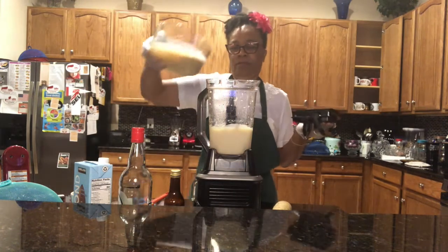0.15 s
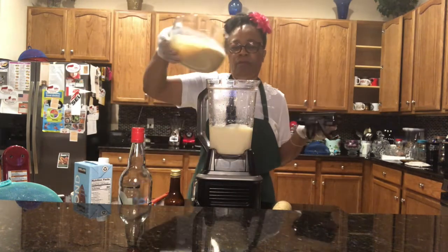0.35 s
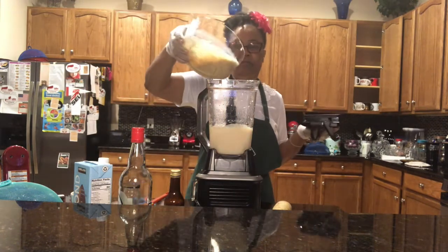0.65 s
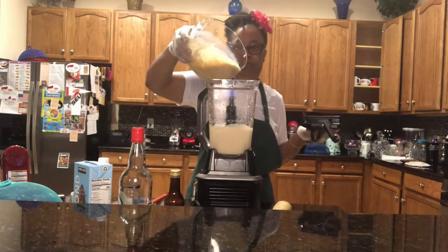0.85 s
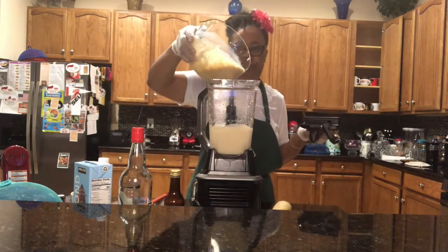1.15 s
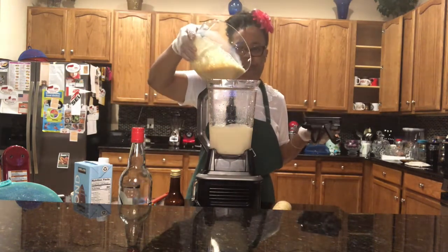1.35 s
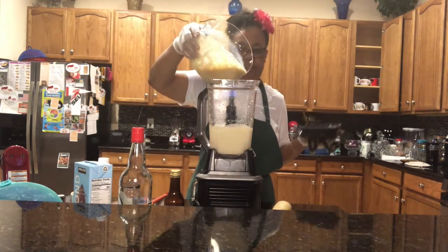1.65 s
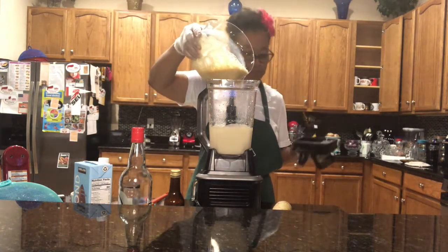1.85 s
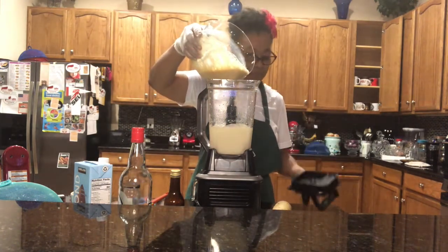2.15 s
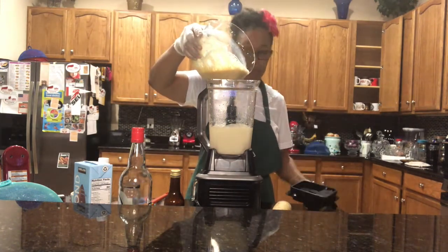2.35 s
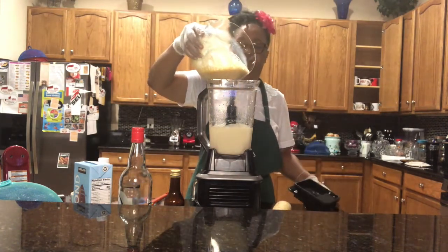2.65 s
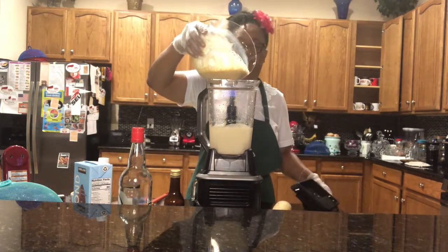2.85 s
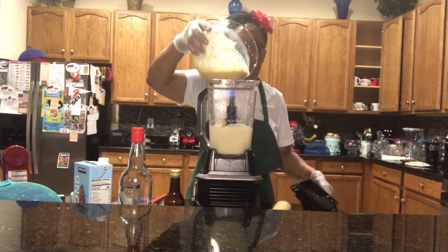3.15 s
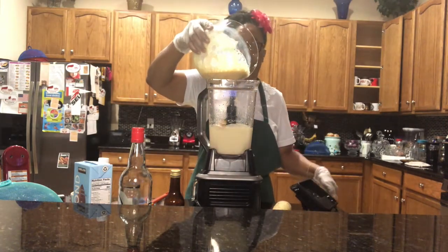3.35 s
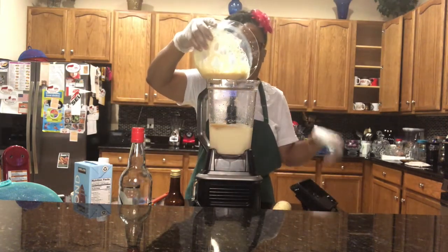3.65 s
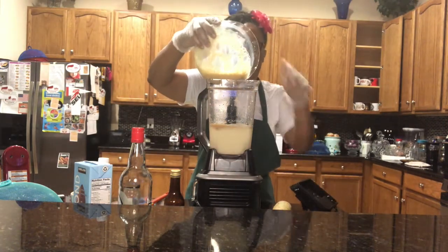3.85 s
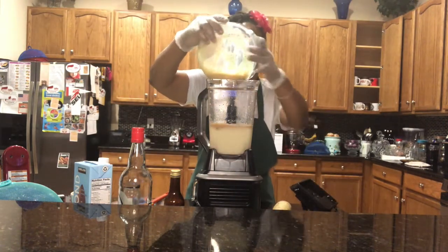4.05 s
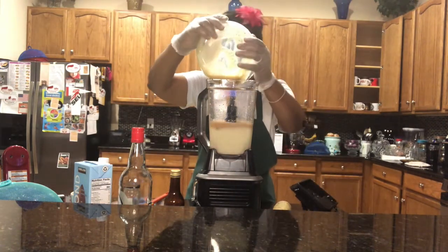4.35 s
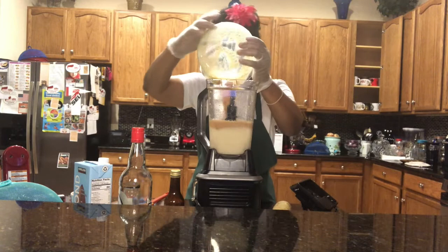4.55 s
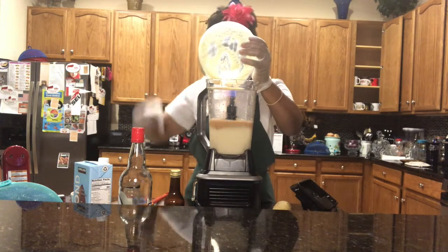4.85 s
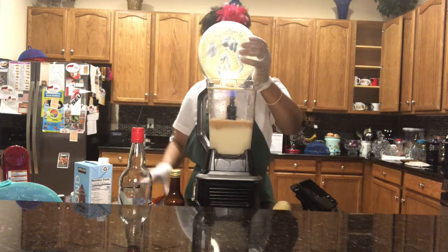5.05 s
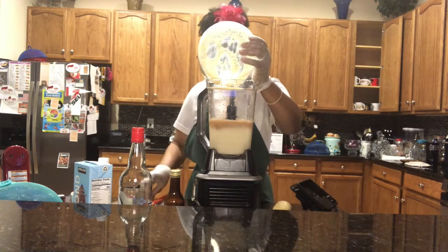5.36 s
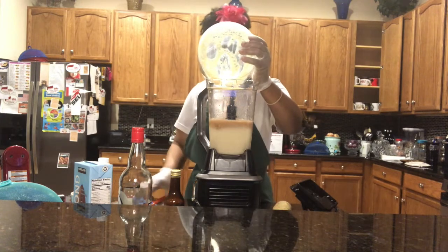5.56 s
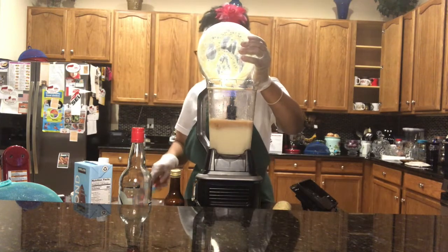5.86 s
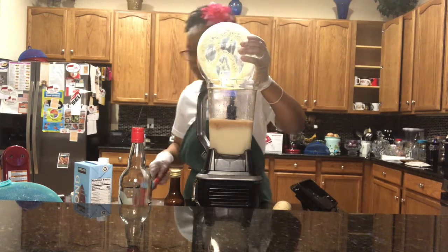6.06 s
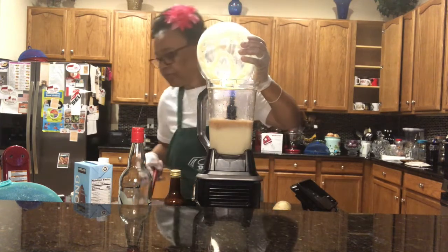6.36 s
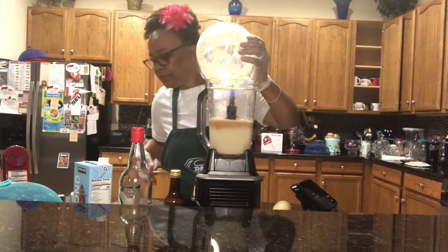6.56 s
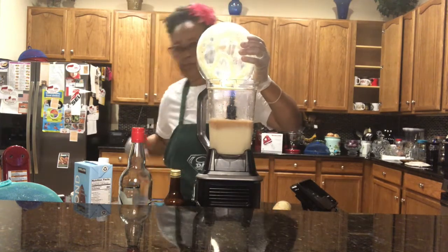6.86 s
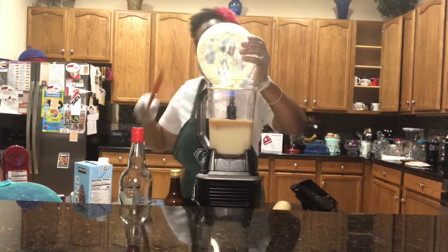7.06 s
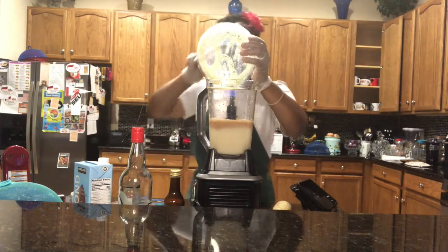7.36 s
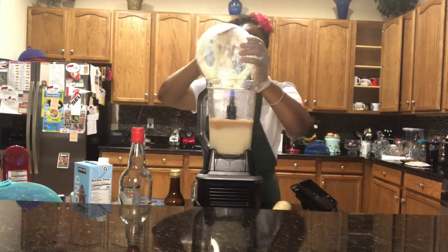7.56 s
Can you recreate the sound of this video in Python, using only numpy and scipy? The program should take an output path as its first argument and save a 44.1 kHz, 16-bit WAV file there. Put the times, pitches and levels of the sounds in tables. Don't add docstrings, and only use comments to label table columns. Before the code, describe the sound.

A quiet kitchen with hard walls, heard from across the counter: soft low room air and a steady faint fridge hum throughout. A very faint, high, distant squeak slips downward at 0.4 s and briefly again at 0.74. At 0.82 a glass bowl knocks firmly on a blender jar, short, low and damped; a light touch follows at 1.74. At 2.15 a plastic lid hits the counter with a loud dull clack, bounces, then drops flat around 2.66 with small rocking clacks. Soft bowl bumps come at 3.3-3.6, faint cloth rustle near 3.8, dry ticks and another bowl touch at 4.6. Tiny glass nudges follow at 5.0-5.2, a handle knock on a jar at 5.4, weaker at 5.6. Rustling leads through light grazes at 6.5 to a very loud, bright glass bottle clink at 6.65, its short ring trailing into the room. Muted spatula and bowl taps close at 7.5-7.6.

```python
import sys
import numpy as np
from scipy import signal
from scipy.io import wavfile
from scipy.ndimage import uniform_filter1d

SR = 44100
rng = np.random.default_rng(int(sys.argv[2]) if len(sys.argv) > 2 else 0)


def digitize_waveform(pressure):
    field = np.atleast_2d(pressure).T
    bounded = np.clip(field, -1, 1)
    quanta = np.round(bounded * 32767).astype(np.int16)
    wavfile.write(sys.argv[1], SR, quanta)


def elevation(decibels):
    levels = np.asarray(decibels, float)
    return 10 ** (levels / 20)


N = 340011

# frequency in Hz, level in dB per Hz.
AIR_COLOUR = [(22, -55.5), (40, -29.5), (58, -11), (110, -10.5), (180, -4.5), (260, -9), (450, -11),
              (700, -15), (1000, -20), (2000, -28), (4000, -31.5), (7600, -35), (8600, -40.5), (14000, -44),
              (16000, -57.5)]
# time in seconds, level in dB.
AIR_SWELL = [(0, -2), (3.2, 0), (7.71, -1)]
# frequency in Hz, width of the fuzz in Hz, level in dB, steady share from 0 to 1.
FRIDGE_TONES = [(60, 6, -85, .4), (150, 8, -80, .3), (231, 14, -69, .85), (309, 10, -77, .6),
                (419, 10, -77, .6), (2250, 60, -94, .1), (3140, 45, -90, .4)]
# start in seconds, length in seconds, first pitch in Hz, top level in dB.
SQUEAK_SLIPS = [
    (.4, 0.33, 4465, -78.5),
    (0.739, 0.093, 4260, -80),
]
# start in seconds, length in seconds, top level in dB,
# brightness as high band minus low band in dB.
CLOTH_STROKES = [
    (1.003, 0.22, -95, 10),
    (3.8, 0.53, -74, -12),
    (4.498, .2, -84, -3),
    (4.984, 0.23, -81, 5.5),
    (5.699, 0.45, -80.5, 0),
    (6.119, .28, -75.5, 3),
    (6.419, 0.22, -73, -6),
]

# start in seconds, peak in dB, hardness in dB per octave above 1 kHz, # crack against the ring in dB.
BOWL_BLOWS = [(.8175, -26.5, 1, -15), (.833, -47, -2, -3), (.845, -34, -1, -17), (.863, -46, 1, -14),
              (1.741, -50, -5, -4), (3.333, -47.5, -8, -10), (3.436, -43, -3.5, -10), (3.513, -58, 0, -15),
              (3.623, -53.5, -3, -14), (4.6, -54, -4, -22), (4.607, -48, -5, -29), (7.555, -39, -2, -14)]
LID_BLOWS = [
    (2.1452, -19.5, -0.5, -4.5),
    (2.184, -31.5, 0, -1),
    (2.278, -35.5, -7, 8),
]
LID_SETTLES = [
    (2.596, -47, -2, -14),
    (2.6595, -34, 1.5, 4),
    (2.666, -28.5, 2.5, -2),
    (2.724, -34, 1.5, 2),
    (2.74, -40.5, -3, -17),
    (3.029, -60, 2, -11),
]
JAR_NUDGES = [
    (5.018, -51.5, -2.5, -4),
    (5.04, -57, -4, -8),
    (5.14, -59, 3, -8),
    (5.222, -57.5, 1, -3),
]
HANDLE_BLOWS = [
    (5.4062, -38, -2.4, 7.5),
    (5.423, -42.5, 2, 7),
    (5.608, -53, -3, 5),
    (5.62, -55, -5.5, 6),
    (5.634, -57, -3, -12),
]
BOTTLE_GRAZES = [
    (6.524, -65, 0, -12),
    (6.545, -57.5, -1, -2.5),
    (6.562, -58, -3.5, -5.5),
    (6.571, -45, 0, -13.5),
]
BOTTLE_BLOWS = [
    (6.634, -49.5, -4, -10.5),
    (6.646, -9, -1.1, -4),
]
SPATULA_BLOWS = [
    (7.469, -50.5, -8, -13),
    (7.474, -48, 0.5, -5),
    (7.482, -44, -5.5, -17),
    (7.602, -58, -2, -10.5),
]

# frequency in Hz, level in dB, time to fall 60 dB in seconds.
BOWL_MODES = [(490, -1, .024), (560, 0, .03), (630, -3, .024), (3080, -19, .01)]
LID_MODES = [(560, -5, .016), (660, 0, .018), (800, -2, .016), (1150, -4, .01)]
JAR_LOW_MODES = [(716, 0, .14), (1940, -5, .07), (3122, -2, .07), (4339, -6, .08)]
HANDLE_MODES = [(716, -9, .16), (1330, -7, .02), (1534, -4, .03), (1930, -8, .06), (2584, -4, .02),
                (3122, -7, .07), (4339, -13, .08), (5750, -19, .04), (11140, -5, .01), (13550, -11, .01)]
BOTTLE_LOW_MODES = [(1918, 0, .25), (3055, -9, .06)]
SPATULA_MODES = [(480, -2, .025), (600, 0, .02), (1500, -8, .01), (2600, -9, .025), (4000, -15, .018),
                 (8700, -30, .008)]
BOTTLE_HZ = [726, 1373, 1912, 1922, 2410, 3012, 3055, 3215, 3620, 4255, 4338, 5058, 5214, 5250, 5771, 7180,
             7381, 9873, 12010, 14350]
# level in dB, time to fall 60 dB in seconds.
BOTTLE_RINGS = [(-30.5, 0.15), (-31, 0.2), (-19, 0.45), (-12, .2), (-24, 0.13), (-14, .15), (-3, .16),
                (-9, 0.061), (-6, 0.012), (-18.5, .15), (-10, 0.21), (-14, 0.16), (-15.5, 0.1),
                (-18.5, .15), (-20, 0.31), (-15, 0.1), (-21, 0.15), (-28, .12), (-25.5, .04), (-10, .025)]

# frequency in Hz, level in dB per Hz.
BOWL_CRACK = [(300, -3), (600, 0), (1500, -3.5), (3000, -7), (6000, -18.5), (15000, -32)]
LID_CRACK = [(250, -51), (420, -8.5), (650, -2.5), (1200, -5.5), (1700, -7.5), (2500, -13), (4700, -12.5),
             (8000, -25), (12000, -29.5), (16000, -37)]
HANDLE_CRACK = [(290, -30.5), (500, -16.5), (714, -13.5), (909, -17.5), (1300, 2), (2330, -7), (3090, -0.5),
                (4740, -19), (8490, -37), (11100, -25), (15000, -37.5)]
BOTTLE_CRACK = [(200, -28), (500, -23), (1000, -18), (2000, -15.5), (2600, -12.5), (3500, -3.5), (5000, -7),
                (6500, -21.5), (8000, -19), (10500, -25), (12500, -25), (14300, -15.5), (16000, -28)]

# start in seconds, peak in dB, centre in Hz.
TICKS = [(1.729, -51, 1800), (1.748, -66, 4000), (2.034, -53, 5670), (3.1, -67, 1200), (3.249, -64.5, 2090),
         (3.33, -52, 2070), (3.701, -62, 2600), (3.873, -62, 3500), (4.048, -60, 2000), (4.23, -63, 2700),
         (4.4463, -53, 2300), (4.708, -73, 2980), (5.109, -64, 6460), (5.164, -56, 4000),
         (5.818, -58.5, 3900), (6.437, -59.5, 1593), (6.494, -59, 4350), (6.586, -49, 7400)]
# start in seconds, peak in dB, centre in Hz.
PINGS = [
    (2.034, -57.5, 3820),
    (2.062, -61, 1310),
    (2.147, -47, 4900),
    (4.449, -58.5, 1480),
    (4.54, -67, 6900),
    (5.823, -68, 8060),
    (5.949, -59.5, 3700),
    (6.588, -68, 12600),
]
# frequency in Hz, time to fall 60 dB in seconds.
ROOM_DECAY = [(200, 0.57), (500, 0.61), (1500, 0.77), (4000, 0.72), (8000, 0.68), (14000, 0.28)]


def evened(x):
    return x / np.sqrt(np.mean(x ** 2) + 1e-30)


def read(points, hz):
    f, value = np.transpose(points)
    return np.interp(np.log(hz + 1), np.log(f + 1), value)


def add(mix, s, sound):
    part = mix[round(s * SR):][:len(sound)]
    part += sound[:len(part)]


def resonate(x, hz, width):
    turn = np.exp(2j * np.pi * np.cumsum(hz * np.ones(len(x))) / SR)
    r = np.exp(-np.pi * width / SR)
    smooth = signal.lfilter([1 - r], [1, -r], x / turn)
    return 2 * (turn * smooth).real


def band(x, lo_hz, hi_hz):
    return signal.sosfilt(signal.butter(2, [lo_hz, hi_hz], "bandpass", fs=SR, output="sos"), x)


def bassless(x, cut_hz):
    return signal.sosfilt(signal.butter(3, cut_hz, "highpass", fs=SR, output="sos"), x)


def fridge_hum():
    out = np.zeros(N)
    for hz, width, db, steady in FRIDGE_TONES:
        fuzz = resonate(rng.standard_normal(N), hz, width)
        fuzz = evened(resonate(fuzz, hz, width))
        tone = np.sqrt(2) * np.sin(2 * np.pi * (hz * np.arange(N) / SR + rng.random()))
        out += elevation(db) * (steady * tone + np.sqrt(1 - min(steady, 1) ** 2) * fuzz)
    return out


def air():
    frames, hz = N // 512 + 5, np.fft.rfftfreq(2048, 1 / SR)
    a, b, patches = rng.standard_normal((frames, 1025, 3)).T
    patches = uniform_filter1d(patches, 20, 0)
    patches = evened(uniform_filter1d(patches, 6, 1))
    spectrum = (a + 1j * b) * elevation(read(AIR_COLOUR, hz)[:, None] + patches)
    noise = signal.istft(spectrum, nperseg=2048, noverlap=1536)[1]
    tone = elevation(-67.5) * evened(noise[:N]) + fridge_hum()
    return tone * elevation(np.interp(np.arange(N) / SR, *np.transpose(AIR_SWELL)))


def squeak():
    rise_s, sag_hz_per_s, fade_db_per_s = 0.025, 720, 32
    out = np.zeros(N)
    for s, length, hz, top_db in SQUEAK_SLIPS:
        t = np.arange(0, length, 1 / SR)
        whistle = evened(resonate(rng.standard_normal(len(t)), hz - sag_hz_per_s * t, 25))
        edges = np.minimum(np.minimum(t, length - t) / rise_s, 1)
        add(out, s, elevation(top_db - fade_db_per_s * t) * edges * whistle)
    return out


def click(colour, tilt_db):
    hz = abs(np.fft.fftfreq(2048, 1 / SR))
    gain_db = read(colour, hz) + tilt_db * np.log2(np.maximum(hz, 1000) / 1000)
    log_gain = np.log(elevation(gain_db))
    pulse = np.fft.ifft(np.exp(np.conj(signal.hilbert(log_gain)))).real[:1024]
    return pulse / np.linalg.norm(pulse)


def flutter_of(count, t, depth):
    rock_s = 0.017
    rock = uniform_filter1d(rng.standard_normal((2, count, len(t))), round(rock_s * SR))
    wander = evened(rock[0]) + 1j * evened(rock[1])
    return 1 + depth * np.minimum(t / rock_s, 1) * wander


def struck(blows, modes, colour, rise_s, crack_s, lag_s, room_db, cut_hz=390, flutter=0.26):
    hz, db, t60 = np.transpose(modes)[:, :, None]
    t = np.arange(2048 + round(t60.max() * SR)) / SR
    near, far = np.zeros(N), np.zeros(N)
    for s, peak_db, tilt_db, crack_db in blows:
        spot_db = 1.53 * rng.standard_normal(hz.shape) + tilt_db * np.log2(np.maximum(hz, 1000) / 1000)
        swell = (1 - np.exp(-t * hz / 1000 / rise_s)) ** 2
        tones = (flutter_of(len(hz), t, flutter) * np.exp(2j * np.pi * hz * t)).imag
        ring = (elevation(db + spot_db - 60 * t / t60) * swell * tones).sum(0)
        ring = np.roll(ring, round(lag_s * SR))
        chatter = rng.standard_normal(2048) * np.exp(-t[:2048] / crack_s)
        pulse = np.pad(click(colour, tilt_db), (0, len(t) - 1024))
        crack = signal.fftconvolve(chatter, pulse)[:len(t)]
        size = elevation(crack_db) * np.linalg.norm(ring)
        heard = ring + size * crack / np.linalg.norm(crack)
        gain = elevation(peak_db) / abs(heard).max()
        add(near, s, gain * heard)
        add(far, s, gain * elevation(room_db) * (ring + size * pulse))
    return bassless(np.array([near, far]), cut_hz)


def bowl():
    return struck(BOWL_BLOWS, BOWL_MODES, BOWL_CRACK,
                  rise_s=0.0019, crack_s=0.0054, lag_s=0.001957, room_db=-9.2)


def rustle():
    out = np.zeros(N)
    for s, length, top_db, bright_db in CLOTH_STROKES:
        u = np.linspace(0, 1, round(length * SR))
        clumps = elevation(1.6 * evened(uniform_filter1d(rng.standard_normal(len(u)), 300)))
        slips = clumps * rng.standard_normal(len(u))
        cloth = evened(band(slips, 770, 2900)) + elevation(bright_db) * evened(band(slips, 2100, 6400))
        stroke_db = top_db + np.interp(u, [0, 0.61, 1], [-10.5, 0, -10.5])
        add(out, s, elevation(stroke_db) * cloth * signal.windows.tukey(len(u), .15))
    return out


def puffs(rows, share, room_db):
    out, t = np.zeros((2, N)), np.arange(900) / SR
    for s, peak_db, hz in rows:
        width = share * hz
        puff = rng.standard_normal(len(t)) * np.exp(-t / 0.0016)
        impulse = 1. * (t == 0)
        tick = resonate(resonate(puff, hz, width), hz, width)
        plain = resonate(resonate(impulse, hz, width), hz, width)
        gain = elevation(peak_db) / abs(tick).max()
        add(out[0], s, gain * tick)
        add(out[1], s, gain * elevation(room_db) * np.linalg.norm(tick) / np.linalg.norm(plain) * plain)
    return out


def ticks():
    return puffs(TICKS, share=0.97, room_db=0)


def pings():
    return puffs(PINGS, share=0.17, room_db=-4.5)


def lid():
    put_down = struck(LID_BLOWS, LID_MODES, LID_CRACK,
                      rise_s=0.0019, crack_s=0.0069, lag_s=0.0011, room_db=-3.0, cut_hz=440)
    drops_flat = struck(LID_SETTLES, LID_MODES, LID_CRACK,
                        rise_s=0.0014, crack_s=0.0052, lag_s=0.0011, room_db=0.3, cut_hz=200)
    return put_down + drops_flat


def jar_nudge():
    return struck(JAR_NUDGES, JAR_LOW_MODES, HANDLE_CRACK,
                  rise_s=0.00052, crack_s=0.008, lag_s=.0003, room_db=-2.5, flutter=.9)


def handle():
    return struck(HANDLE_BLOWS, HANDLE_MODES, HANDLE_CRACK,
                  rise_s=0.00039, crack_s=0.006, lag_s=.0002, room_db=0.)


def bottle_graze():
    return struck(BOTTLE_GRAZES, BOTTLE_LOW_MODES, HANDLE_CRACK,
                  rise_s=0.0029, crack_s=.008, lag_s=.0003, room_db=1.5)


def bottle():
    modes = np.column_stack([BOTTLE_HZ, BOTTLE_RINGS])
    return struck(BOTTLE_BLOWS, modes, BOTTLE_CRACK,
                  rise_s=0.0005, crack_s=0.0041, lag_s=.0002, room_db=-2.5, cut_hz=270, flutter=.8)


def spatula():
    return struck(SPATULA_BLOWS, SPATULA_MODES, BOWL_CRACK,
                  rise_s=0.00078, crack_s=0.0038, lag_s=.0005, room_db=-4.5)


def kitchen(x):
    taps = np.zeros(SR)
    at = np.arange(60, SR - 10, 10)
    taps[at + rng.integers(0, 10, len(at))] = rng.choice([-1., 1.], len(at))
    hz, t, z = signal.stft(taps, SR, nperseg=256)
    decay = elevation(-60 * t / read(ROOM_DECAY, hz)[:, None])
    tail = signal.istft(z * decay, SR, nperseg=256)[1][:SR]
    tail *= 1 - np.exp(-np.arange(SR) / SR / 0.0045)
    return signal.fftconvolve(x, tail / np.linalg.norm(tail))[:N]


def scene():
    near, far = (bowl() + ticks() + pings() + lid() + jar_nudge() + handle()
                 + bottle_graze() + bottle() + spatula())
    return (air() + squeak() + near + rustle() + kitchen(far))[None]


def low_pass(x):
    return signal.sosfilt(signal.butter(12, 16720, fs=SR, output="sos"), x)


def record(dry):
    edge_hz = 16500
    limited = signal.oaconvolve(dry, signal.firwin(255, edge_hz, fs=SR)[None], "same")
    return low_pass(limited)


dry = scene()
out = record(dry)
digitize_waveform(out)
```